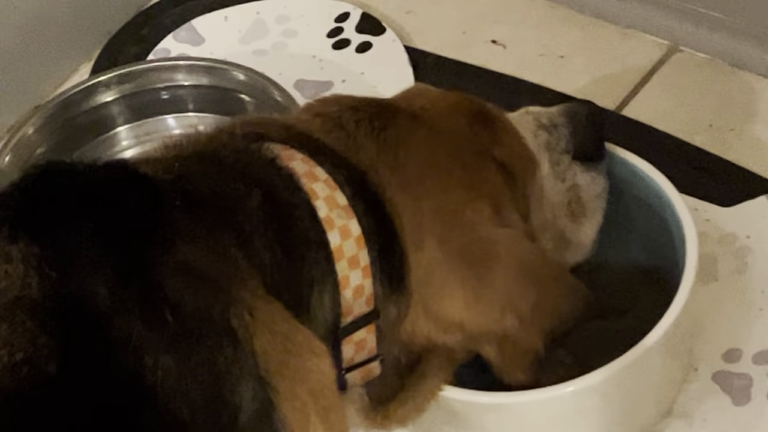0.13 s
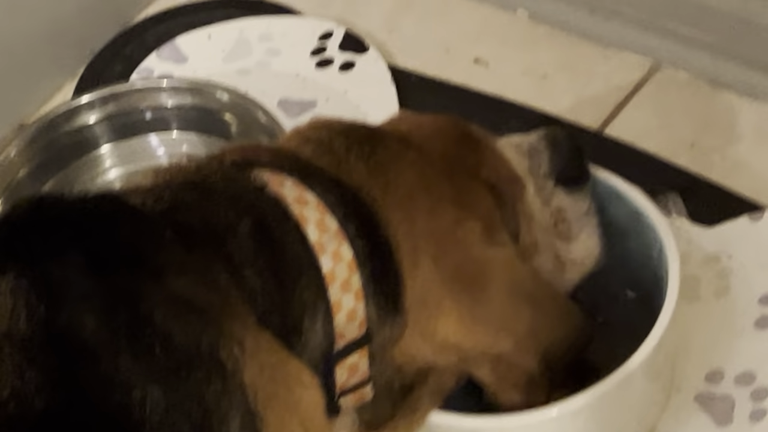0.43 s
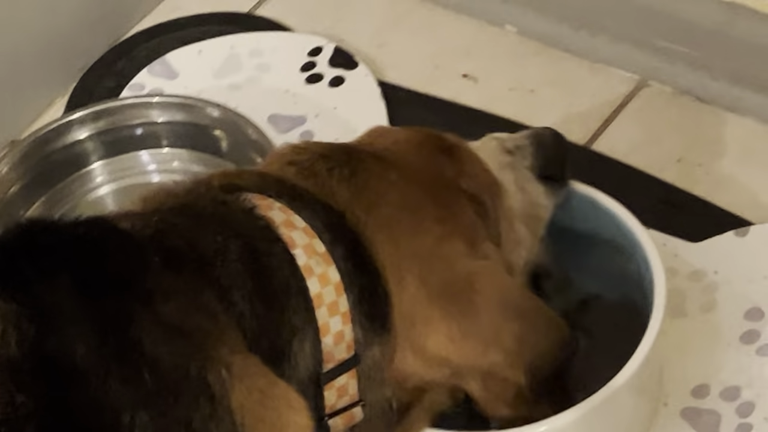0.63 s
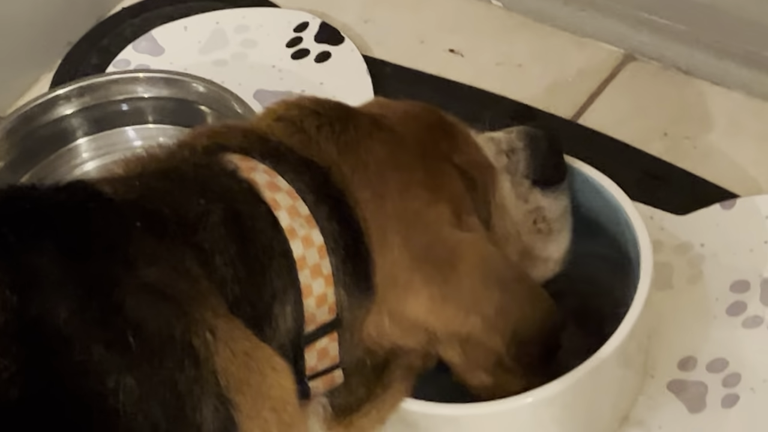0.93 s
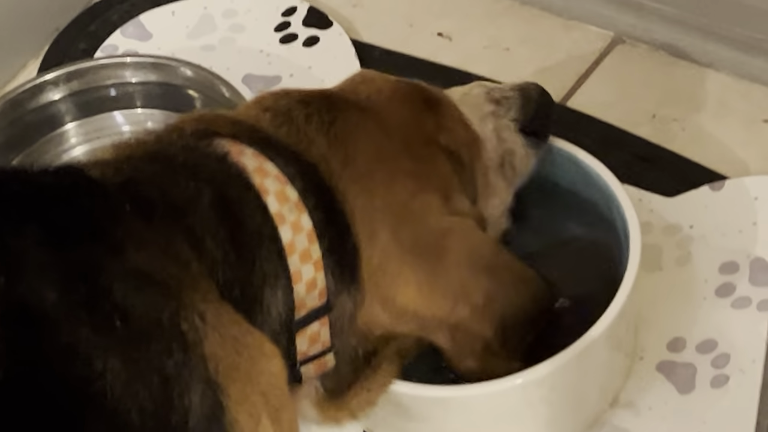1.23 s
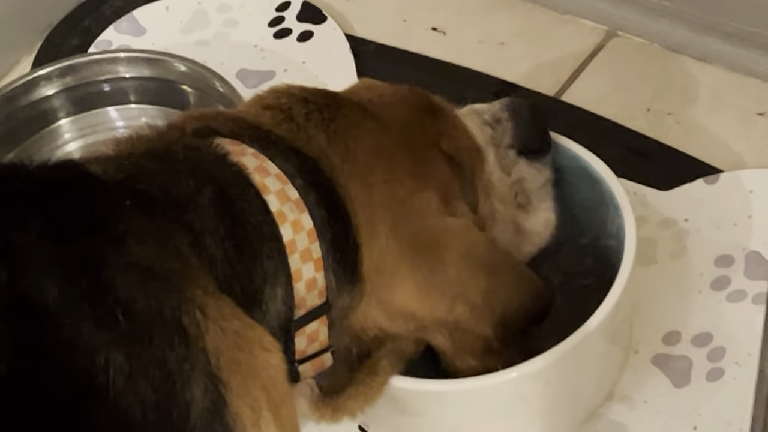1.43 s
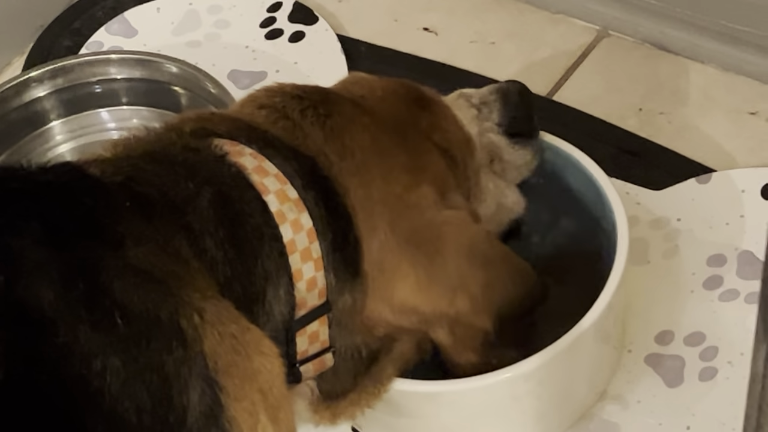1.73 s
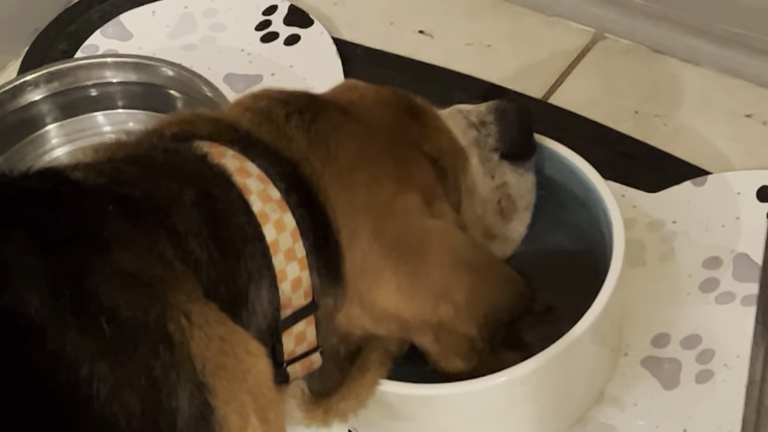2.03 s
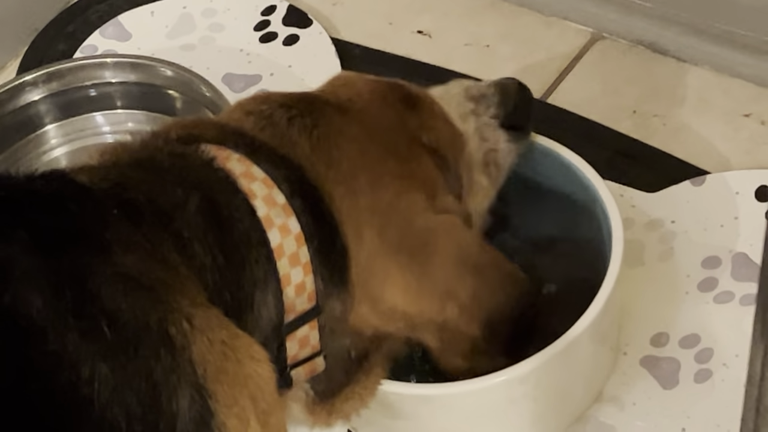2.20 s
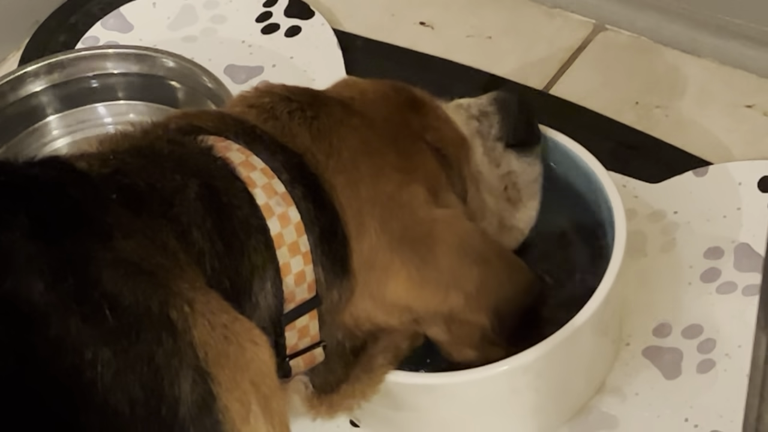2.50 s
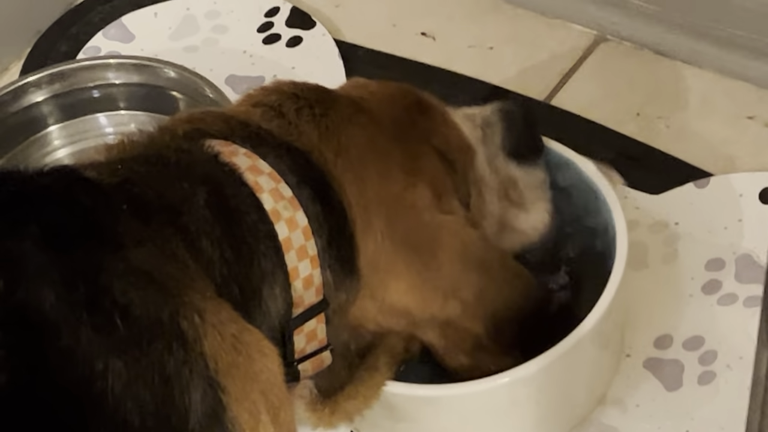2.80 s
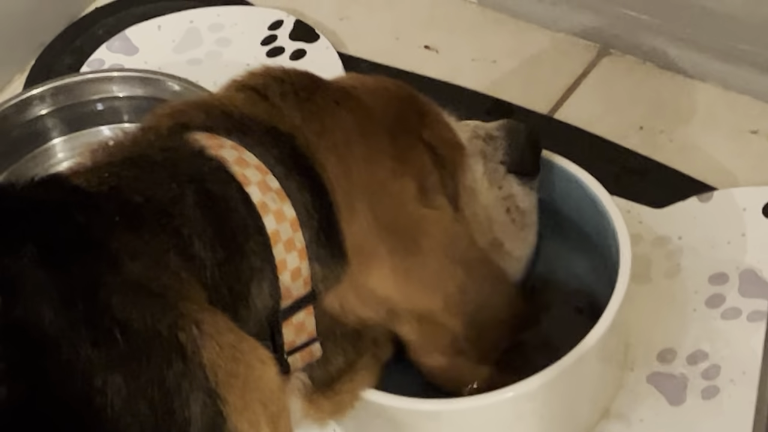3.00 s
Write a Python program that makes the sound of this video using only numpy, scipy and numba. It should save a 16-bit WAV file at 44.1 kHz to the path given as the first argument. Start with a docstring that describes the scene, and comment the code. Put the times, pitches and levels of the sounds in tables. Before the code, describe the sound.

A dog laps water from a ceramic bowl, heard close from above. After a faint smack over low house rumble, crisp wet slaps land near 0.2, 0.6, 1.2, 1.6, 2.2 and 2.6 seconds, the first and the last two with strong pops. Spatter, soft smacks, low gulps, bubbles and faint high droplets fill between. The bowl rings slightly; a small tiled kitchen adds short echo.

```python
"""A faint wet smack over a low household rumble comes first, then a dog's tongue slaps water in a ceramic bowl.
Slaps burst into crowds of short sine pops, low thuds and sprays of coloured noise; single pops add clicks.
Gulps, bubbles and a few high droplets are swelling sines, smacks fall in between, and the bowl rings along.
A small hard tiled kitchen answers with a fading noise tail; a phone held close above hears it all."""
import sys
import numpy as np
from scipy import signal
from scipy.fft import rfft, irfft
from scipy.io import wavfile
from scipy.ndimage import uniform_filter1d
from numba import njit

SR = 44100
rng = np.random.default_rng(int(sys.argv[2]) if len(sys.argv) > 2 else 0)


def pcm_store(signal):
    """Save signal as 16-bit PCM."""
    levels = np.round(np.clip(np.atleast_2d(signal), -1, 1) * 32767)
    wavfile.write(sys.argv[1], SR, levels.astype(np.int16).T)


def convert_level_to_amplitude(level_db):
    """Map a level in decibels to its linear amplitude factor."""
    exponent = np.asarray(level_db, float) / 20
    return 10 ** exponent


N = 138915  # samples, 3.15 s

# tongue slaps: (time [s], level [dB], middle pitch of the pops [Hz],
#                thud against the slap [dB], spray against the slap [dB]), before the offsets of each layer
TONGUE_SLAPS = [(0.2055, -21, 2705, 0, -10), (0.6386, -14, 2230, -19, -22.5),
                (1.187, -15.5, 3800, -8.5, -12), (1.624, -17, 2253, -9.5, -14),
                (2.1842, -21.5, 1863, -27, -13.5), (2.6042, -10, 2610, -13.5, -21)]
# small wet smacks of tongue and falling water, before the offsets of each layer:
# (time [s], level [dB], middle pitch [Hz], time to fade 60 dB [s], taken as 0.02 or more)
WET_SMACKS = [(0, -42, 724, 0.29), (0.191, -38, 1950, 0.59), (0.268, -26.5, 1635, 0.042),
              (0.365, -44, 4300, 0.12), (.405, -44, 910, 0.48), (0.416, -35, 2330, 0.087),
              (0.517, -45.5, 1290, 0.68), (.597, -38.5, 1074, 0.028), (.616, -34.5, 1000, 0.045),
              (0.7, -46, 1780, 0.14), (0.779, -44, 3340, 0.26), (0.95, -41, 1854, 0.43),
              (1.124, -41, 2110, 0.98), (1.35, -43.5, 980, 0.29), (1.376, -31, 1745, 0.07),
              (1.565, -43, 3950, 0.31), (1.601, -34, 976, 0.049), (1.699, -35, 1920, 0.44),
              (1.807, -33.5, 1634, 0.13), (1.929, -48, 7400, 0.38), (2.155, -33.5, 3090, 0.016),
              (2.175, -24, 1210, 0.32), (2.255, -24.5, 4500, 0.074), (2.271, -26.5, 7800, 0.045),
              (2.341, -36.5, 1555, 0.15), (2.359, -35, 6000, 0.071), (2.504, -54, 4420, 0.1),
              (2.581, -36, 1330, 0.029), (2.789, -45.5, 3880, 1)]
# single pops and droplets, loud and faint: (time [s], level [dB], pitch [Hz], length to fade 20 dB [cycles])
SINGLE_POPS = [(0.2095, -7.5, 3300, 2.05), (0.2178, -20, 2490, 9.5), (0.6408, -27, 2630, 1.3),
               (0.647, -26, 1850, 1.4), (.684, -37, 6070, 15), (0.686, -38, 2460, 12), (.712, -39, 1660, 7),
               (1.378, -29.5, 3230, 1.7), (1.189, -17, 4280, 3.8), (1.2, -16.5, 3760, 11),
               (1.628, -23.5, 1170, 7.3), (1.6776, -19, 1994, 7.3), (2.1855, -4.5, 1840, 3.15),
               (2.190, -8.5, 1930, 2.7), (2.2006, -13.5, 1483, 2), (2.2006, -27, 5860, 4.3),
               (2.255, -30.5, 4300, 7.6), (2.27, -36.5, 6280, 18), (2.363, -48, 6400, 24),
               (2.597, -32, 3010, 6.4), (2.6045, -13, 3550, 5.3), (2.607, -9.5, 2340, 4.2),
               (2.608, -29, 2310, 6.6), (2.658, -27.5, 1690, 9)]
# gulps, bubbles and a few high droplets:
# (time [s], level [dB], starting pitch [Hz], length to fade 20 dB [cycles], pitch rise over that length [share])
GULPS_AND_DROPLETS = [(0.21, -29.5, 226.6, 9.8, 0.065), (0.224, -27, 392, 7.2, -0.023),
                      (.235, -30, 504, 10, 0.29), (.323, -25, 203, 4.8, 0.089),
                      (0.371, -37, 472, 6.8, 0.0011), (0.413, -33.5, 238, 7, 0.03),
                      (.405, -35, 646, 4.2, -0.091), (0.506, -44, 220, 19.8, 0.14),
                      (.535, -36, 291, 3.8, 0.41), (.788, -39, 740, 8.6, -0.095),
                      (.795, -27.5, 642, 11.5, 0.055), (1.19, -37, 224.4, 14.3, 0.025),
                      (1.203, -31.5, 642, 24, 0.08), (1.31, -31.5, 222, 4.9, 0.098),
                      (1.355, -28, 227, 3.4, -0.025), (1.42, -33.5, 243, 5.2, -0.06),
                      (1.399, -49, 3040, 81, -0.029), (1.404, -29.5, 600, 3.9, -0.0017),
                      (1.41, -31, 450, 3.4, -0.02), (1.455, -31.5, 255, 3.3, 0.5),
                      (1.63, -32.5, 236, 9.7, -0.098), (1.64, -32, 400, 21, 0.023),
                      (1.633, -21.5, 743, 5.3, -0.017), (1.715, -36.5, 191, 3.4, -0.054),
                      (1.783, -32, 222, 2.8, -0.09), (1.808, -38.5, 635, 14.2, 0.09),
                      (2.161, -42, 555, 9.6, 0.48), (2.198, -35.5, 475, 30, -0.0083),
                      (2.272, -38, 218, 6, -0.028), (2.288, -36.5, 213, 6.9, 0.12),
                      (2.358, -40.5, 220, 6.3, -0.044), (2.61, -26.5, 236, 6, -0.00039),
                      (2.615, -28, 368, 9.8, 0.073), (2.694, -32, 200, 1.7, 0.1),
                      (2.756, -37, 490, 7.8, 0.34), (2.772, -36.5, 527, 9.8, 0.53),
                      (2.769, -45, 3250, 29, -0.18), (2.789, -49, 4260, 27, 0.01),
                      (2.79, -37, 1050, 6.4, 0.23)]
# colour of the spray: (frequency [Hz], relative level [dB per Hz])
SPRAY_COLOUR = [(150, -14), (422, -6), (979, -17), (1170, -5), (2810, -9.5), (3920, -11), (8230, -15),
                (9260, -26.5), (11300, -17), (16000, -30)]
# colour of the water sloshing after each slap: (frequency [Hz], relative level [dB per Hz])
SLOSH_COLOUR = [(80, -0.5), (220, 10), (500, 9), (1000, 0.5), (2500, -3.5), (6000, -32.5)]
# ringing of the bowl and its water:
# (pitch [Hz], gain alike at both ports [dB], gain opposite at the ports [dB], time to fade 60 dB [s])
BOWL_MODES = [(395, -55.5, -62.5, 0.63), (470.2, -53.5, -68.5, 0.19), (1099, -57.5, -44, 0.29),
              (1170, -52.5, -62, 0.18), (1745, -66.5, -58, 0.28)]
# how long the room rings: (frequency [Hz], time to fade 60 dB [s])
ROOM_FADE = [(150, 0.47), (1000, 0.35), (4000, 0.11), (12000, 0.3)]
# colour of the house rumble and hiss: (frequency [Hz], relative level [dB per Hz])
HOUSE_COLOUR = [(25, -14), (64, 10), (123, -3), (476, -14), (840, -22.5), (1480, -22), (3720, -35),
                (8140, -35), (9570, -44.5), (11000, -39), (11900, -29), (16000, -50)]
# shaping of the difference between left and right: (frequency [Hz], gain of the side signal [dB])
STEREO_WIDTH = [(30, -14.5), (150, -17), (500, -6), (1200, -4.5), (3000, -15), (6000, -16.5), (8500, -6),
                (14000, -2)]
# treble bands missing from the middle signal: (low edge [Hz], high edge [Hz])
MIDDLE_GAPS = [(8850, 10150), (13800, 15100), (16200, 21000)]
# treble bands missing from the side signal: (low edge [Hz], high edge [Hz])
SIDE_ONLY_GAPS = [(15800, 21000)]

BLOB = 2.0  # grain outline that stays round, then stops softly
RING = 1.0  # grain outline that rings out evenly


def shape(x, table):
    """Colour a sound by making each frequency louder or softer, following a table."""
    points = np.array(table, float)
    freqs = np.fft.rfftfreq(x.shape[-1], 1 / SR)
    gain_db = np.interp(np.log(freqs + 1), np.log(points[:, 0]), points[:, 1])
    return irfft(rfft(x) * convert_level_to_amplitude(gain_db), x.shape[-1])


def unit(x):
    """Scale to an average (rms) strength of 1."""
    return x / np.sqrt(np.mean(x ** 2))


def walk(rate):
    """Smooth random wander with a spread near 1, drawing new values at the given rate [Hz]."""
    hold = int(SR / rate)
    steps = np.repeat(rng.standard_normal(N // hold + 1), hold)
    return 1.625 * uniform_filter1d(uniform_filter1d(steps, hold), hold)[:N]


def fade(start, t60, attack_s):
    """Quick attack at the start time, then a steady decay of 60 dB per t60."""
    t = np.clip(np.arange(N) / SR - start, 0, None)
    return (1 - np.exp(-t / attack_s)) * np.exp(-np.log(1000) * t / max(t60, .02))


def stereo(mid, side):
    """Left and right from a shared middle and an unrelated side signal."""
    side = shape(side, STEREO_WIDTH)
    return np.array([mid + side, mid - side])


@njit
def grains(rows, swell_cycles, outline):
    """Add up short sines that swell, glide in pitch and fade.

    Rows: (time [s], size, pitch [Hz], cycles to fade 20 dB, pitch rise [share])."""
    out = np.zeros(N)
    for start, size, hz, cycles, rise in rows:
        first = int(start * SR)
        span = max(cycles, .5) * SR / hz
        phase = 0.
        for i in range(min(int(3 * span), N - first)):
            phase += 2 * np.pi * min(hz * (1 + rise * i / span), .45 * SR) / SR
            decay = np.exp(-2.3 * (i / span) ** outline)
            swell = 1 - np.exp(-i * hz / SR / swell_cycles)
            out[first + i] += size * np.sin(phase) * decay * swell
    return out


def table_grains(table, rise, swell_cycles, outline):
    """One sine grain for every row (time, level, pitch, cycles, ..) of a table."""
    t = np.array(table, float)
    rises = rise + 0 * t[:, 0]
    rows = np.column_stack([t[:, 0], convert_level_to_amplitude(t[:, 1]), t[:, 2], t[:, 3], rises])
    return grains(rows, swell_cycles, outline)


def burst(start, db, hz, mean_s, cycles, rise, thin_db, count):
    """A crowd of short pops that thins out and, on the whole, weakens after the start."""
    scatter_db, spread_oct = 3, 0.562
    chance = rng.random((count, 2)).T
    luck = rng.standard_normal((count, 3)).T
    late = -np.log(1 - chance[0])  # delay in units of mean_s
    size = convert_level_to_amplitude(db - thin_db * late + scatter_db * luck[0]) * np.sign(chance[1] - .5)
    pitch = np.clip(hz * 2 ** (spread_oct * luck[1]), 100, 15000)
    return np.column_stack([start + mean_s * late, size, pitch, cycles * 1.355 ** luck[2], rise + 0 * late])


def splashes():
    """Slaps burst into pops, low thuds and late spatter; smacks into droplets; gulps shed smaller bubbles."""
    sharp, soft = [], []
    for s, db, hz, thud_db, _ in TONGUE_SLAPS:
        sharp.append(burst(s, db - 8, hz, 0.013, 5.04, 0.303, 7.1, count=40))
        sharp.append(burst(s + 0.00359, db + thud_db - 9.5, 488.6, .02, 5.37, .15, 6.1, count=24))
        soft.append(burst(s + 0.014, db - 23.0, hz, 0.045, 6.6, 0.045, 6.0, count=50))
    for s, db, hz, _ in WET_SMACKS:
        soft.append(burst(s, db - 13.5, hz, 0.011, 9.7, 0.066, 10.5, count=30))
    for s, db, hz, _, _ in GULPS_AND_DROPLETS:
        if hz < 1000:  # leaves out the high droplets
            soft.append(burst(s, db - 11, 2 * hz, .018, 3.45, .2, 5.2, count=8))
    return grains(np.vstack(sharp), 0.69, 0.67) + grains(np.vstack(soft), 2.4, BLOB)


def pops():
    """Each single pop or droplet starts with a sharp, higher click and rings for some cycles."""
    click_db, click_ratio = -14, 1.9
    clicks = [(s, db + click_db, hz * click_ratio, 1.2) for s, db, hz, _ in SINGLE_POPS]
    return -table_grains(SINGLE_POPS, 0.015, 0.16, RING) - table_grains(clicks, 0, 0.24, RING)


def gulps_and_droplets():
    """Gulps, bubbles and a few high droplets are round sine blobs gliding in pitch and wobbling in level."""
    rises = np.array(GULPS_AND_DROPLETS)[:, 4]
    return table_grains(GULPS_AND_DROPLETS, rises, 1.68, BLOB) * convert_level_to_amplitude(2.05 * walk(90))


def spray():
    """Grainy noise thrown across the bowl, brighter for higher smacks, and a slosh that dies away slowly."""
    slap_t60_s, smack_db, bright_db_per_oct = 0.12, -18, 0.5
    slosh_db, slosh_t60_s, side_db = -38, 1.32, 0.5
    slaps = sum(convert_level_to_amplitude(db + spray_db) * fade(s, slap_t60_s, 0.00036) for s, db, _, _, spray_db in TONGUE_SLAPS)
    smack_fades = [fade(s, t60, 0.0037) for s, _, _, t60 in WET_SMACKS]
    out = 0
    for band, tilt in (([60, 2500], -1), ([2500, 6000], 1), ([6000, 20000], 1.2)):
        level = slaps
        for smack, (_, db, hz, _) in zip(smack_fades, WET_SMACKS):
            bright_db = tilt * bright_db_per_oct * np.log2(hz / 2000)
            level = level + convert_level_to_amplitude(db + smack_db + bright_db) * smack
        # fast wander makes the noise grainy
        noise = [unit(shape(rng.standard_normal(N) * convert_level_to_amplitude(4.9 * walk(300)), SPRAY_COLOUR)) for _ in range(2)]
        sos = signal.butter(2, band, "band", fs=SR, output="sos")
        out = out + level * convert_level_to_amplitude(1.8 * walk(60)) * signal.sosfilt(sos, noise)
    slosh = sum(convert_level_to_amplitude(db + slosh_db) * fade(s, slosh_t60_s, 0.011) for s, db, _, _, _ in TONGUE_SLAPS)
    slosh = slosh * convert_level_to_amplitude(4.67 * walk(24.655))
    water = np.array([unit(shape(rng.standard_normal(N), SLOSH_COLOUR)) for _ in range(2)])
    out = out + slosh * water
    return stereo(out[0], convert_level_to_amplitude(side_db) * out[1])


def bowl(x):
    """Splashes and pops set fading sines of the bowl ringing, unevenly at the two ports."""
    t = np.arange(SR // 2) / SR
    ring = 0
    for hz, even_db, opposite_db, t60 in BOWL_MODES:
        gains = convert_level_to_amplitude(even_db) + convert_level_to_amplitude(opposite_db) * np.array([[1], [-1]])
        ring = ring + np.sin(2 * np.pi * hz * t) * convert_level_to_amplitude(-60 * t / t60) * gains
    return signal.fftconvolve(ring, x[None], axes=1)[:, :N]


def room(x):
    """Echoes blur into a noise tail that fades band by band, a little different at each port."""
    room_db, side_db, delay_s = -7.5, 3.5, 0.00083
    t = np.arange(SR) / SR
    hz, t60 = np.array(ROOM_FADE).T
    tail = 0
    for f in 60 * 2 ** np.arange(0, 8.1, .5):
        sos = signal.butter(1, [f / 1.19, f * 1.19], "band", fs=SR, output="sos")
        decay = convert_level_to_amplitude(-60 * t / np.interp(np.log(f), np.log(hz), t60))
        tail = tail + signal.sosfilt(sos, rng.standard_normal((2, SR))) * decay
    tail = tail * np.clip(t / delay_s - 1, 0, 1)  # silent for delay_s, then ramps up as long again
    tail = tail / np.sqrt(np.sum(tail[0] ** 2))
    both = stereo(tail[0], convert_level_to_amplitude(side_db) * tail[1])
    return convert_level_to_amplitude(room_db) * signal.fftconvolve(both, x[None], axes=1)[:, :N]


def house():
    """Half-octave bands of rumble and hiss flicker alone; a shared flicker grows towards the treble."""
    house_db, treble_swell_db = -58, 4
    swell = walk(rate=14)
    noise = shape(rng.standard_normal((2, N)), HOUSE_COLOUR)
    out = 0
    for f in 30 * 2 ** np.arange(0, 9.1, .5):
        sos = signal.butter(2, [f / 1.19, f * 1.19], "band", fs=SR, output="sos")
        flicker_db = treble_swell_db * min(f / 5000, 1) * swell + 1.5 * walk(7.1)
        out = out + signal.sosfiltfilt(sos, noise) * convert_level_to_amplitude(flicker_db)
    return convert_level_to_amplitude(house_db) * stereo(*(out / np.sqrt(np.mean(out[0] ** 2))))


def scene():
    """Water close to the phone, its room echo and the house; gulps and their droplets reach the room less."""
    left_over_right_db, gulp_room_db = 0.3, -10
    near = splashes() + pops()
    blobs = gulps_and_droplets()
    wide = spray()
    echo = room(near + convert_level_to_amplitude(gulp_room_db) * blobs + wide.mean(axis=0))
    balance = convert_level_to_amplitude(np.array([[left_over_right_db], [-left_over_right_db]]) / 2)
    return (near + blobs) * balance + wide + echo + bowl(near) + house()


def roll_off(x):
    """The treble ends steeply here."""
    return signal.sosfilt(signal.butter(12, 16940, fs=SR, output="sos"), x)


def record(dry):
    """Notch filters leave a few treble bands missing from the middle and side signals."""
    parts = [(dry[0] + dry[1]) / 2, (dry[0] - dry[1]) / 2]
    for k, gaps in enumerate((MIDDLE_GAPS, SIDE_ONLY_GAPS)):
        for gap in gaps:
            sos = signal.butter(3, gap, "bandstop", fs=SR, output="sos")
            parts[k] = signal.sosfiltfilt(sos, parts[k])
    mix = np.array([parts[0] + parts[1], parts[0] - parts[1]])
    return roll_off(mix)


dry = scene()
out = record(dry)
pcm_store(out)
```